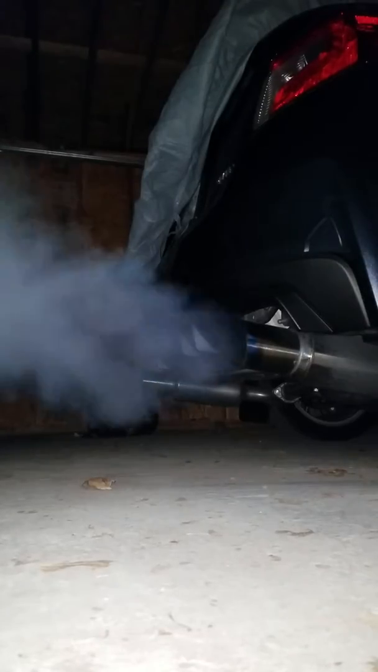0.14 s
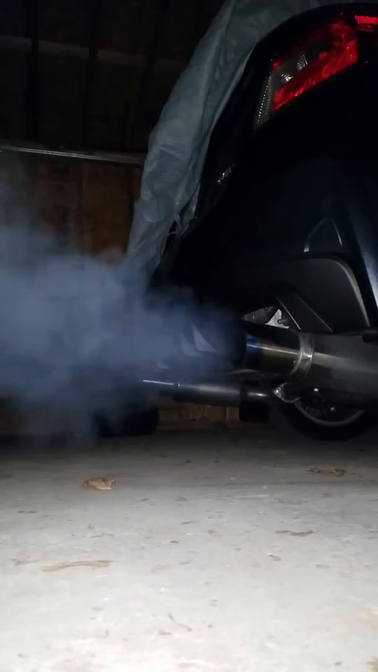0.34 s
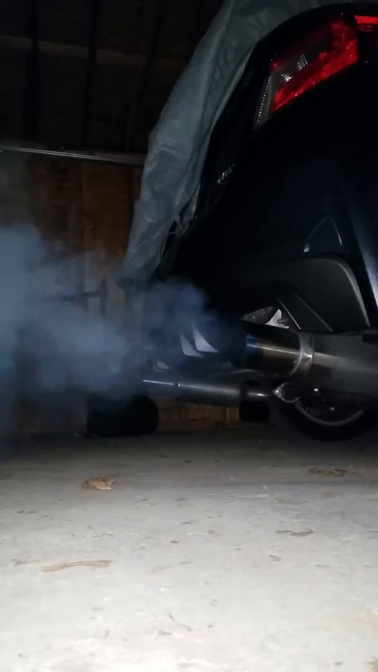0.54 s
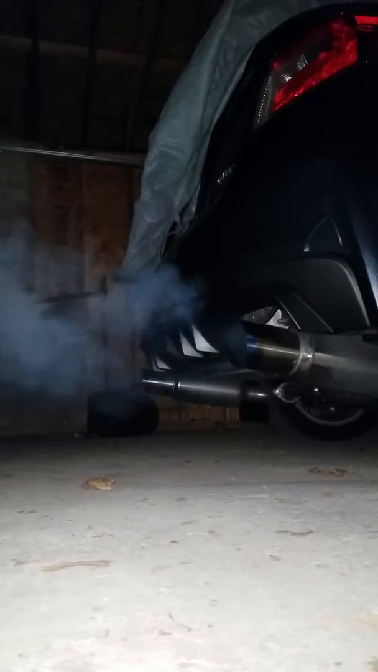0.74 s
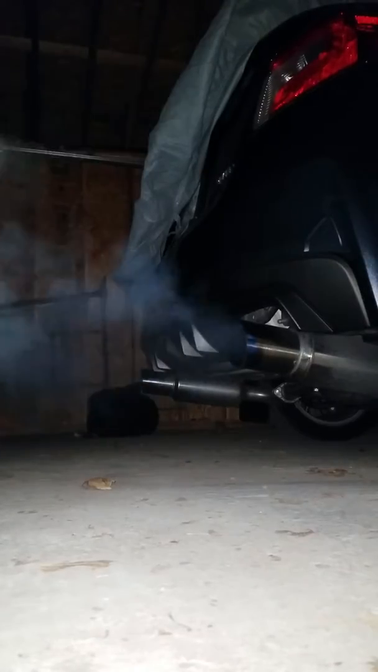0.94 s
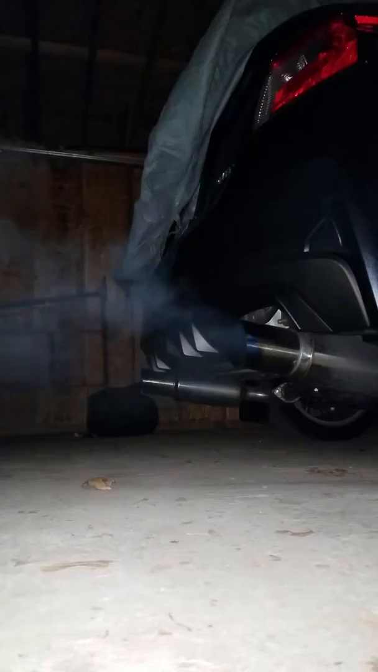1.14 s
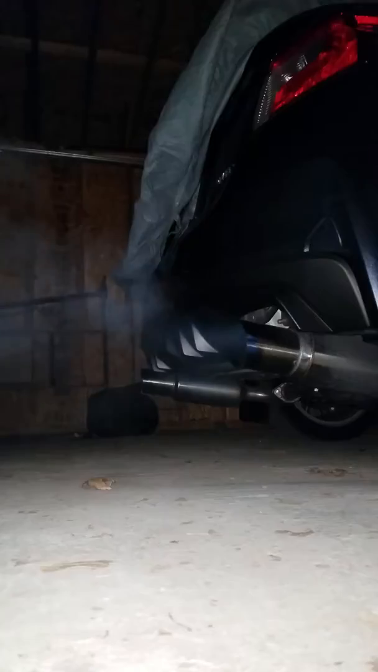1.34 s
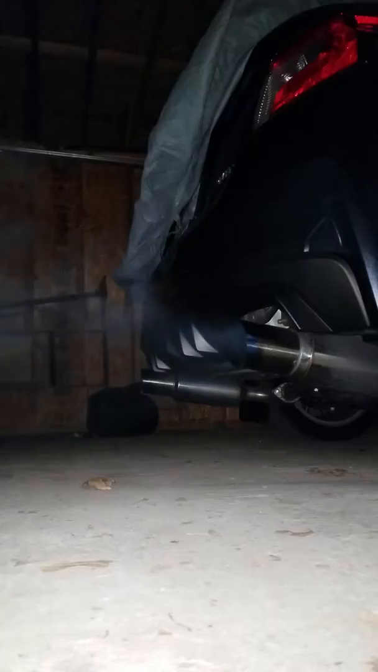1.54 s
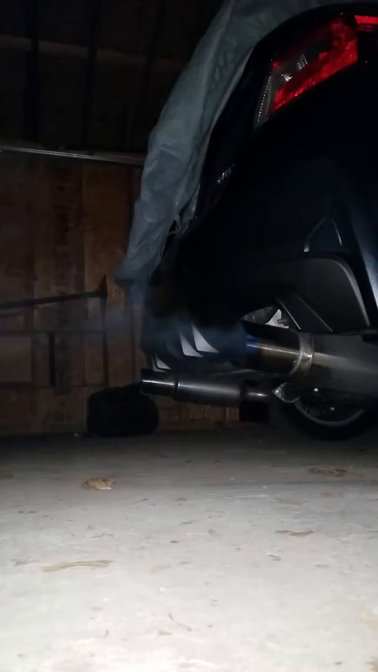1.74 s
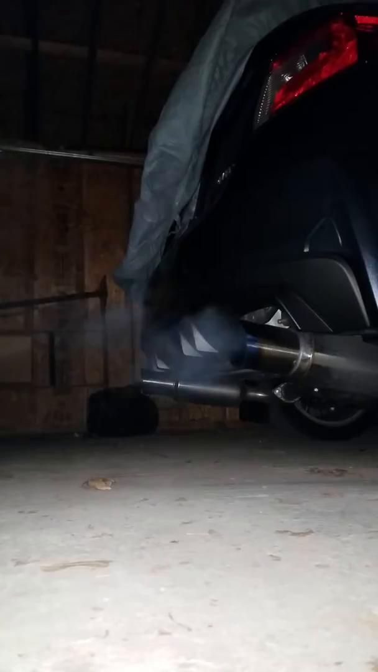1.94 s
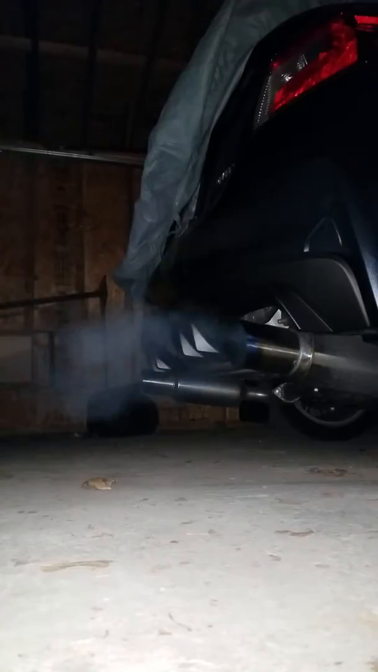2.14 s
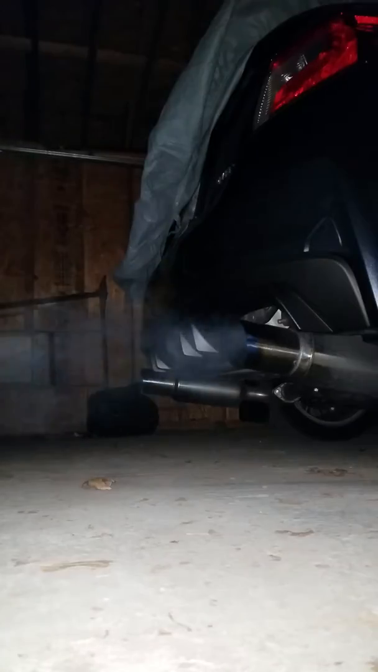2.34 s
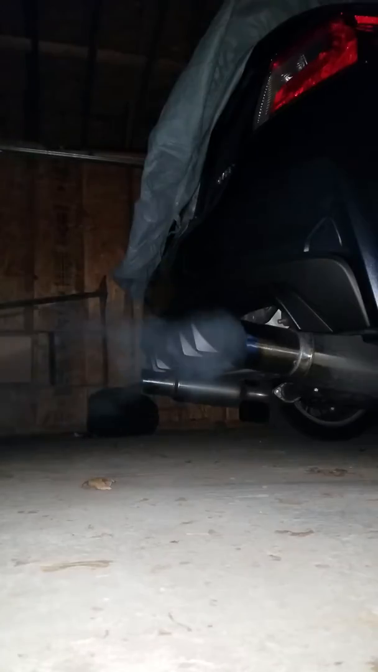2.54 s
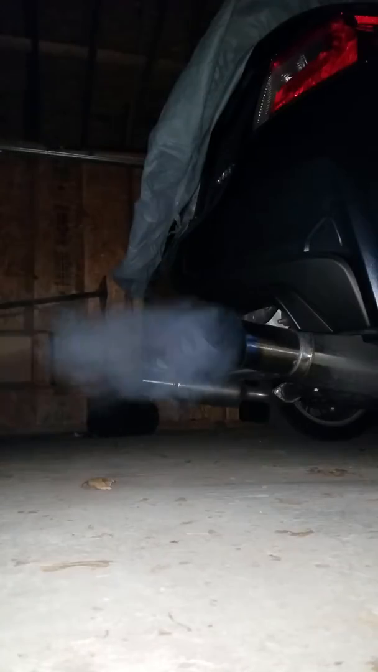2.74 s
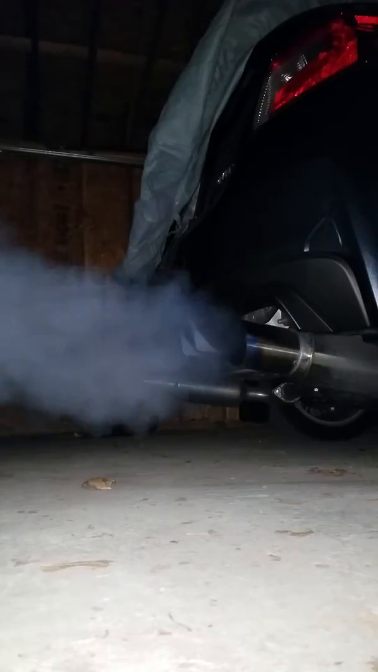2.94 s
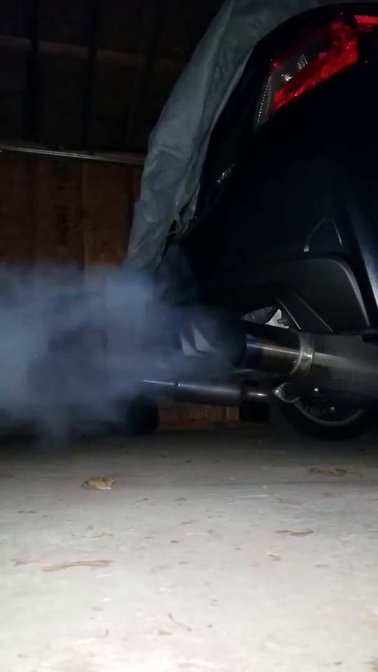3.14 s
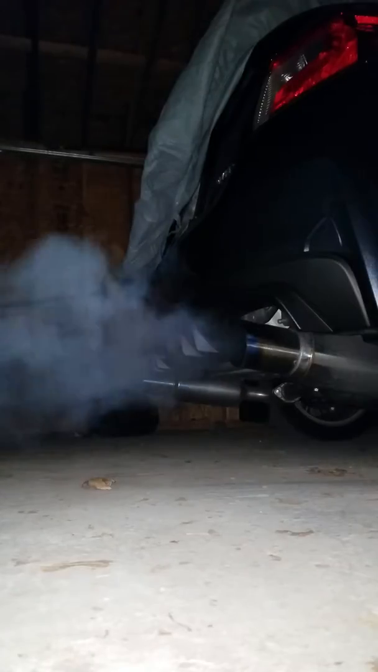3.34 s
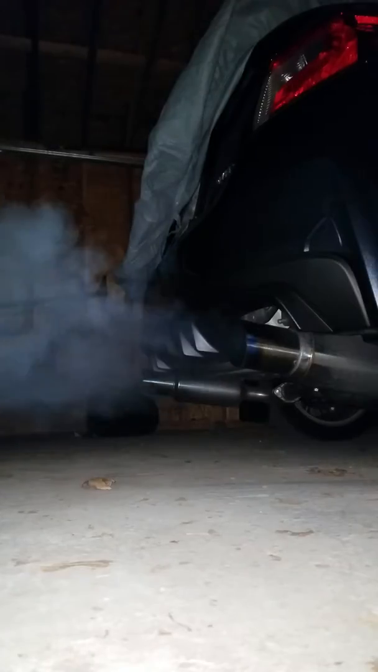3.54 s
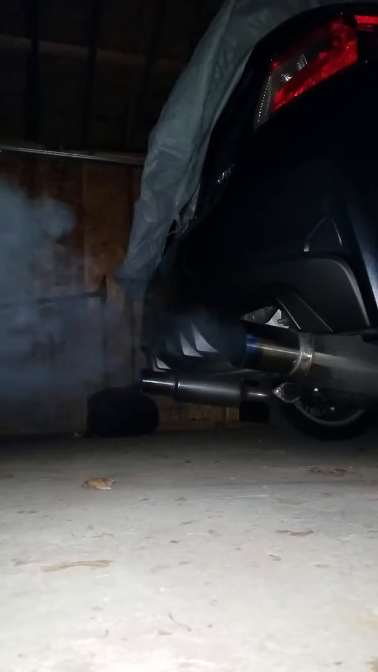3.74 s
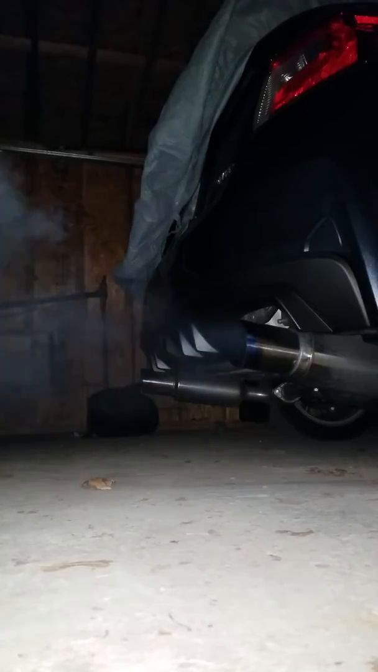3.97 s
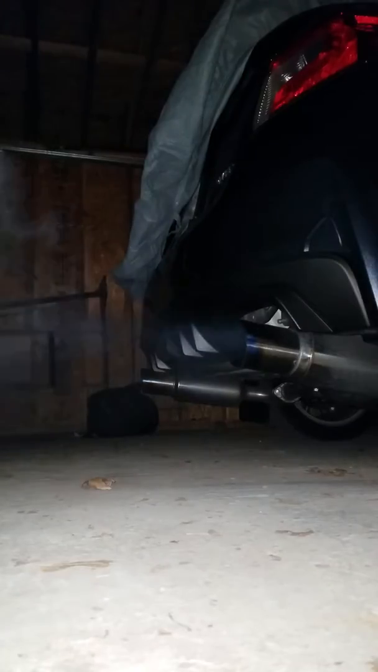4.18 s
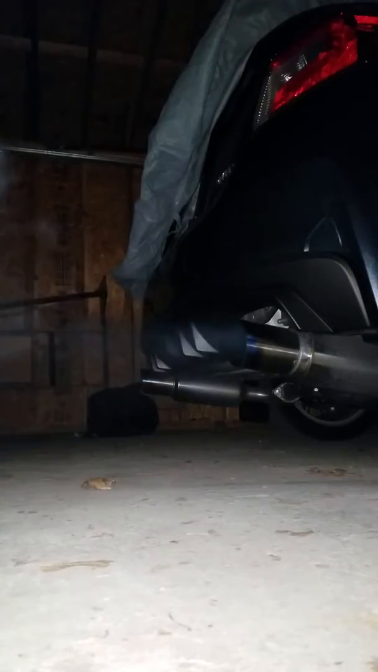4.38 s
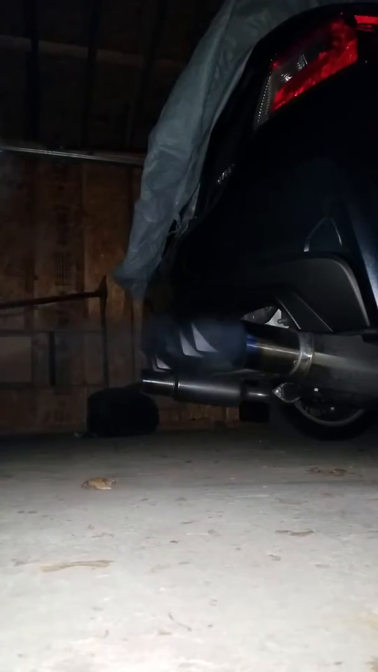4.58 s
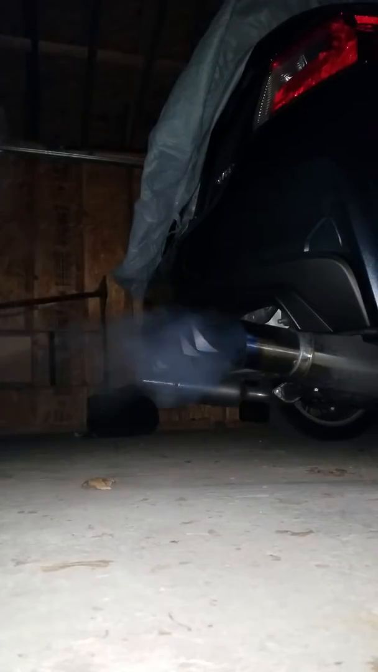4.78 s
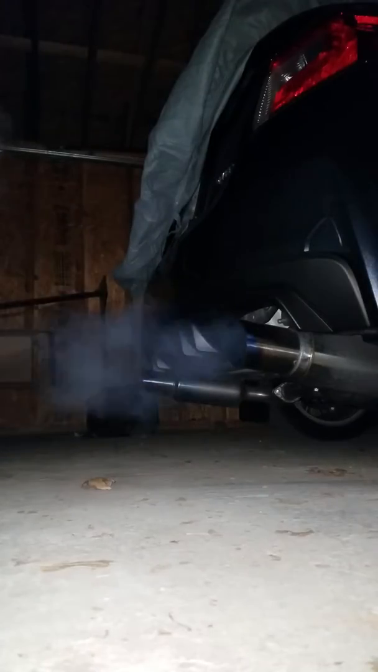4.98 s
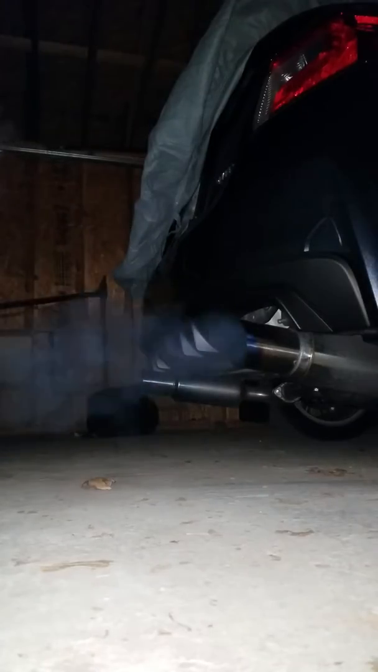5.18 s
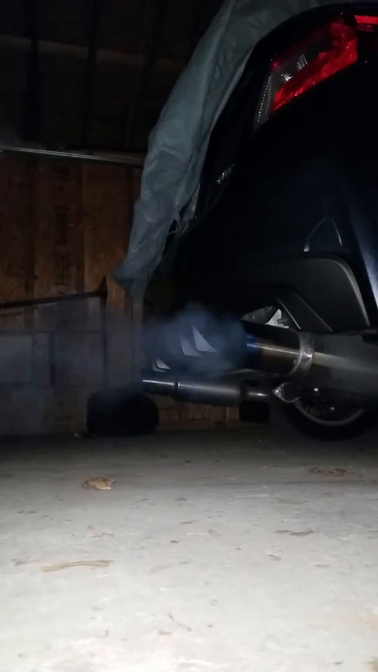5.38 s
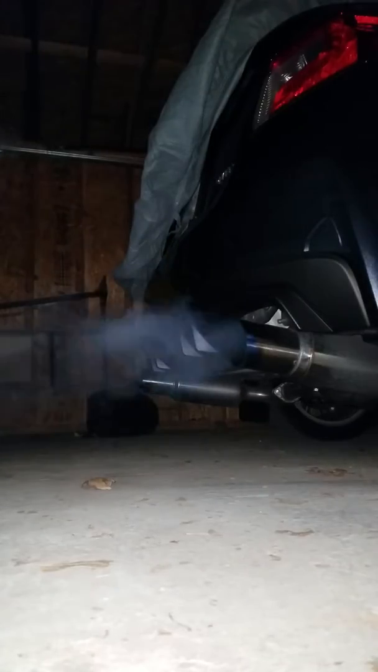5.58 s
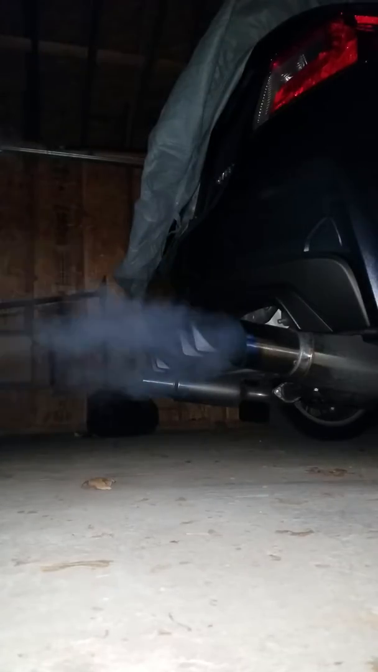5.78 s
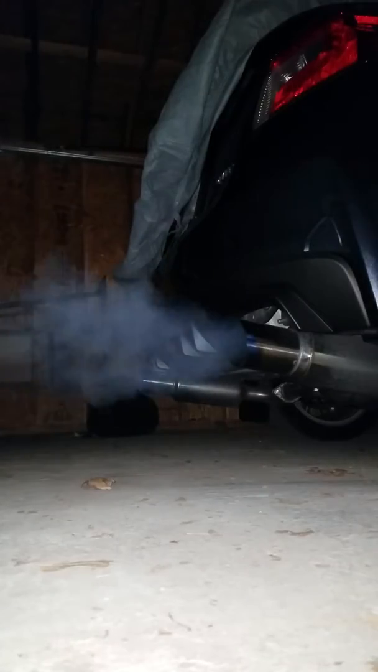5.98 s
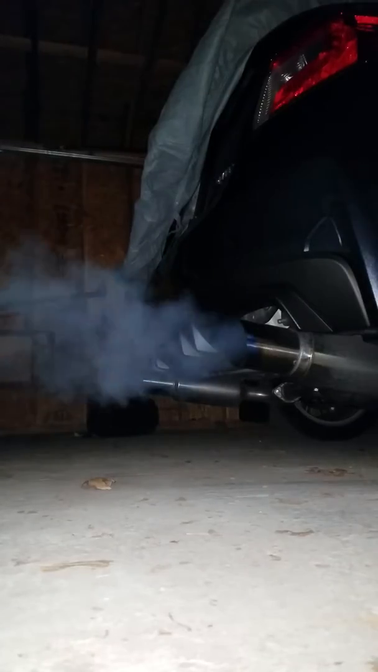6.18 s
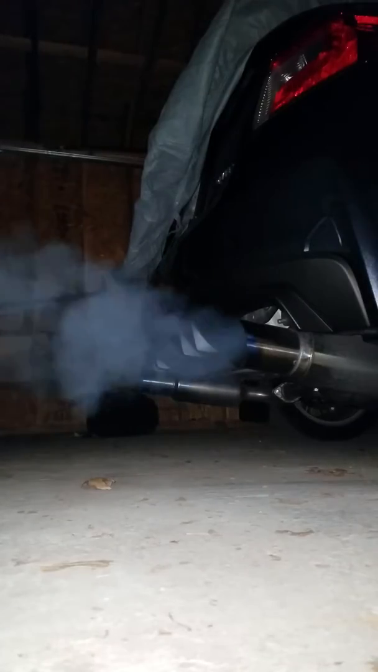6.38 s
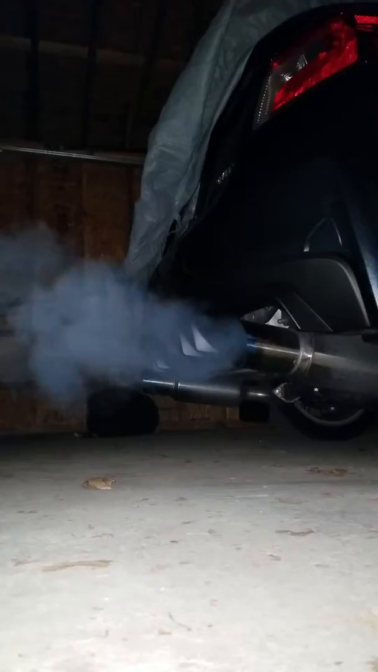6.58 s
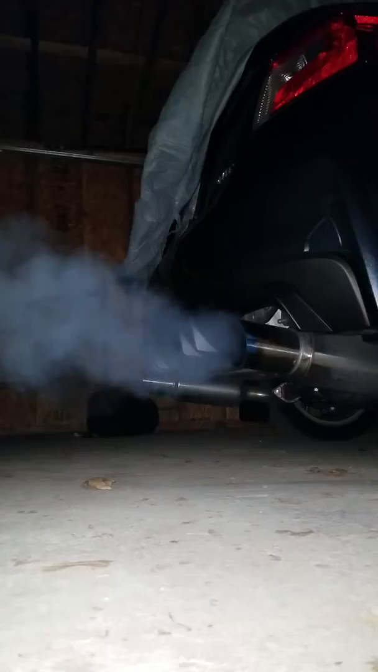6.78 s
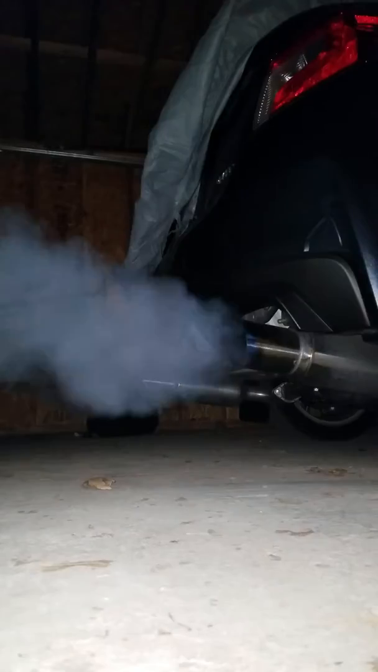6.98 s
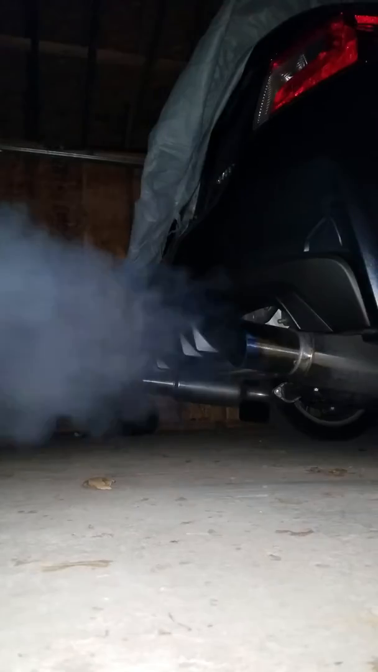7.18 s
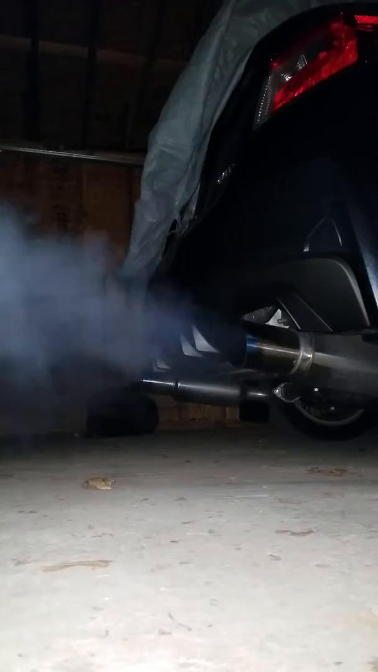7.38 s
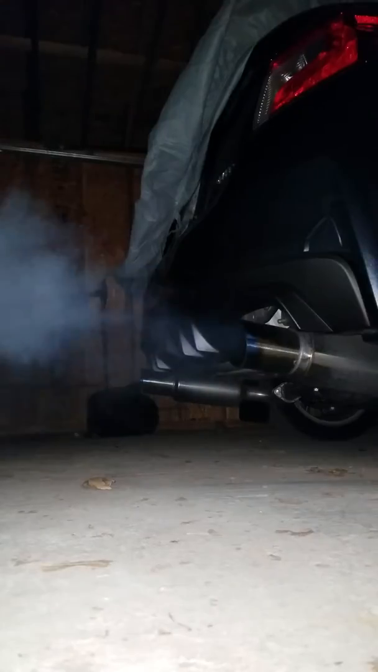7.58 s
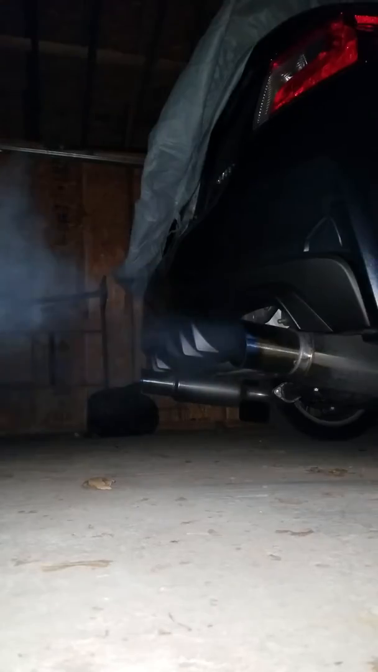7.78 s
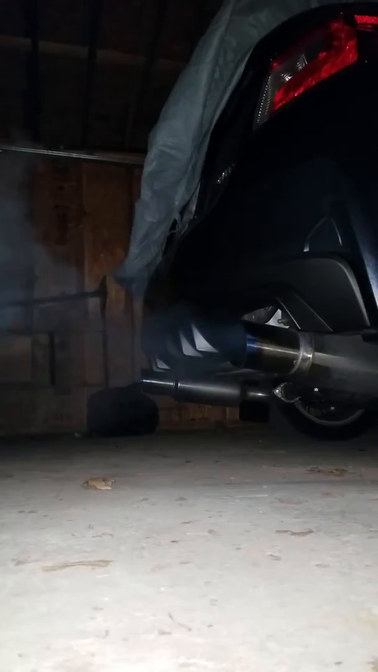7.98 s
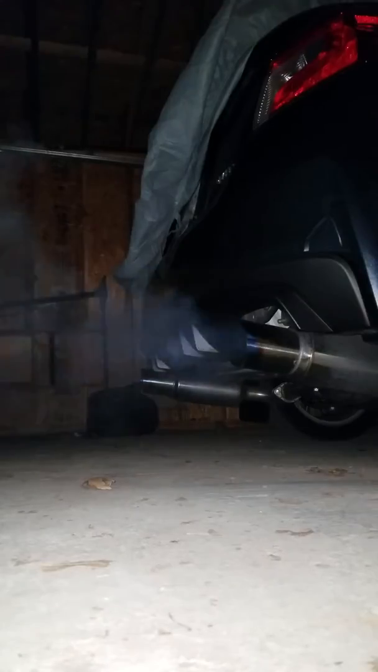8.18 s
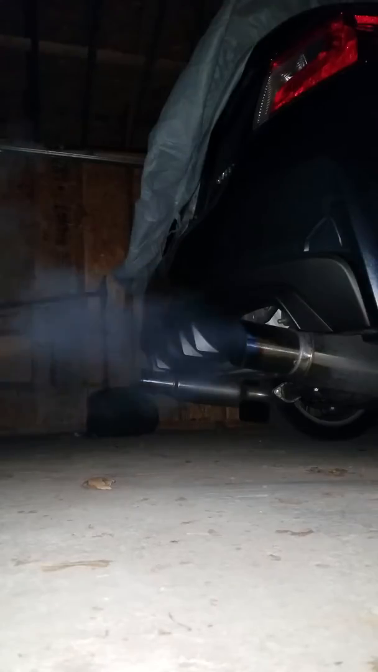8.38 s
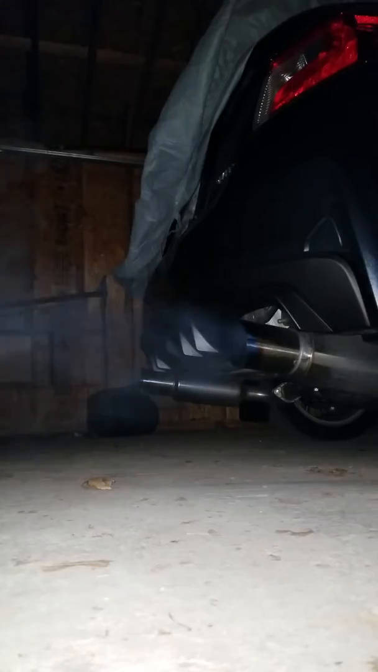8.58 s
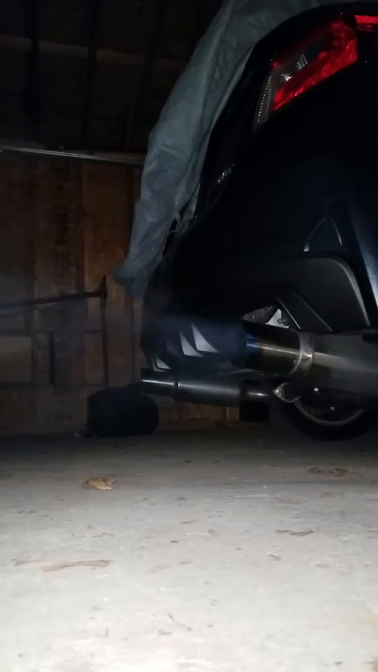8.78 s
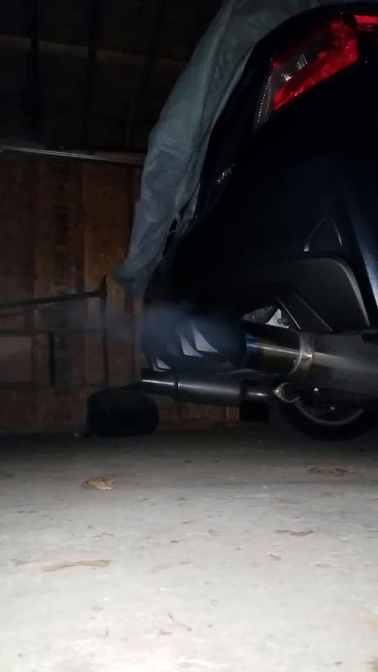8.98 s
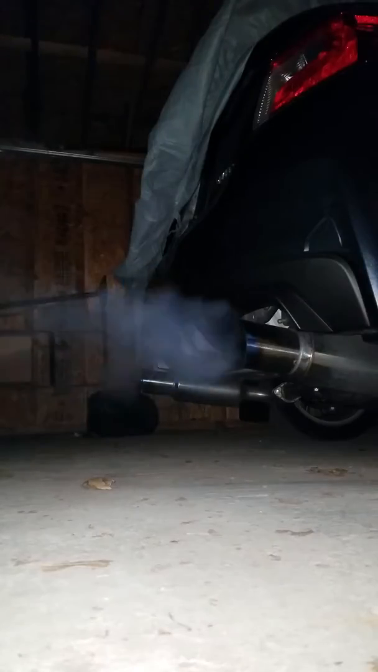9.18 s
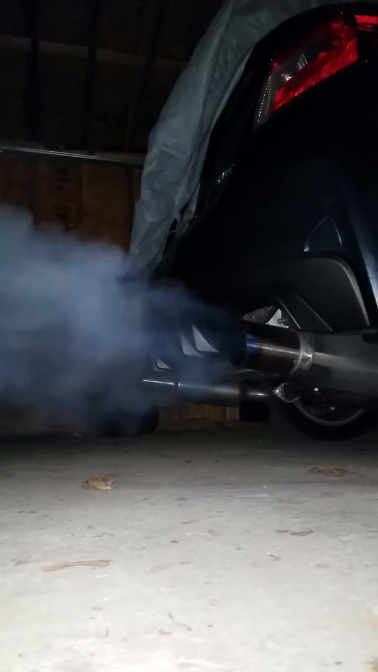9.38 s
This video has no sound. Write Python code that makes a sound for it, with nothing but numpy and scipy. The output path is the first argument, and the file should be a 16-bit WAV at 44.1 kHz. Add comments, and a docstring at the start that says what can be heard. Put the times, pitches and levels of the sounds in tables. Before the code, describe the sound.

A turbocharged flat-four heard very close to its large tailpipe in a closed wooden garage. A rev flares and sinks smoothly into a stumbling idle with dull pops; a second blip does the same, then a longer lumpy idle. A harder blip cracks and bangs, falls with a breathy turbo whistle, and another rev rises at the end.

```python
"""A turbocharged flat-four idles and is blipped in a closed garage, heard close to its big tailpipe.
Each firing sends a pulse and a puff of gas down the exhaust: lumpy under fuel, smooth as the revs fall.
Clean engine orders sing in silencer and pipes; leftover fuel pops, and full load brings cracks and bangs.
The turbo coasts down with a breathy whistle, over the hiss of gas and faint whines of the engine bay."""
import sys
import numpy as np
from scipy import signal
from scipy.fft import rfft, irfft
from scipy.io import wavfile
from scipy.ndimage import uniform_filter1d, minimum_filter1d

SR = 44100
rng = np.random.default_rng(int(sys.argv[2]) if len(sys.argv) > 2 else 0)


def persist_wave(psi):
    """Save psi, clipped to +-1, as 16-bit WAV."""
    counts = np.round(np.clip(psi, -1, 1) * 32767).astype(np.int16)
    wavfile.write(sys.argv[1], SR, np.atleast_2d(counts).T)


N = 415404
TIME = np.arange(N) / SR
REFERENCE_RATE = 60  # firings per s at which the layer levels hold

# The throttle is blipped. Each row: opens in s, fully open in s, shuts in s, strength in dB.
BLIPS = [(-.25,-.08,0.018,-1.5),(2.523,2.79,2.76,-0.5),(6.592,7.13,7.05,0.5),(9.022,9.28,9.62,1)]
# The fuel comes back and the engine stumbles. Each row: start in s, full in s, end in s, strength in dB.
STUMBLES = [(1.739,1.78,2.2,-2),(4.47,4.515,4.6,-1),(4.799,4.862,5.1,-5)]
# It settles to idle. Each row: start in s, full in s, end in s, strength in dB.
IDLES = [(1.755,2.3,2.72,-3),(4.5,5.497,6.85,-0.5)]
# Resonances of main pipe and tailpipe. Each row: pitch in Hz, width in Hz, strength in dB.
PIPE = [(206.8,25,1.8),(241.4,19.2,1.5),(282.3,8.8,-0.5),(344,49,-1.5),(402,38.6,1.2)]
TAILPIPE = [(450,40,2.5),(611.2,36,1),(682,38,-3.5),(770,59,-11)]
# Colour of the rasping gas. Each row: frequency in Hz, relative density in dB per Hz.
RASP = [(500,-6),(800,2.5),(980,7),(1120,0),(1270,6.5),(1420,-24.5),(1800,-30),(2600,-7),(4000,-44.5),(8000,-65.5)]


def from_db(db):
    """Decibels to gain."""
    return 10 ** (np.asarray(db) / 20)


def in_time(rows):
    """The columns of a curve at every sample."""
    s, *columns = np.transpose(rows)
    return [np.interp(TIME, s, c) for c in columns]


def at_hz(points, hz):
    """Read a spectrum on a logarithmic frequency axis."""
    known_hz, db = np.transpose(points)
    return np.interp(np.log(hz), np.log(known_hz), db)


def rms_one(x):
    """Scale to rms 1."""
    return x / np.sqrt(np.mean(x ** 2) + 1e-20)


def evened(x):
    """Hold the slow level at rms 1, keeping the single beats."""
    size = SR // 12
    power = uniform_filter1d(uniform_filter1d(x ** 2, size), size)
    return x / np.sqrt(power + 1e-14)


def cut(x, hz, kind, order=2):
    """Butterworth filter."""
    return signal.sosfilt(signal.butter(order, hz, kind, fs=SR, output="sos"), x)


def panned(x, left_db):
    """Place a sound by its left minus right level."""
    return x * from_db([[left_db / 2], [-left_db / 2]])


def noise(spectrum, alike):
    """Coloured stereo noise of rms 1, partly shared by both sides."""
    hz, _ = np.transpose(spectrum)
    freqs = np.maximum(np.arange(N // 2 + 1) * SR / N, 1)
    white = rng.standard_normal((3, N))
    alike = np.clip(alike, 0, 1)
    pair = np.sqrt(alike) * white[2] + np.sqrt(1 - alike) * white[:2]
    gain = from_db(at_hz(spectrum, freqs)) * np.minimum(freqs / hz[0], 1) ** 2
    return rms_one(irfft(rfft(pair) * gain, N))


def noise_band(hz, order=2):
    """A mono band of noise of rms 1."""
    return rms_one(cut(rng.standard_normal(N), hz, "band", order))


def breathy_tone(hz, width_hz):
    """A narrow stereo band of noise around a pitch that may move."""
    a, b = cut(rng.standard_normal((2, 2, N)), width_hz / 2, "low")
    phase = 2 * np.pi * np.cumsum(hz * np.ones(N)) / SR
    return rms_one(a * np.cos(phase) + b * np.sin(phase))


def waver(hz):
    """Slow chance of spread 1, drawn at 200 steps per second."""
    steps = rng.standard_normal(int(TIME[-1] * 200) + 200)
    low_pass = signal.butter(2, min(hz, 90), fs=200, output="sos")
    slow = signal.sosfilt(low_pass, steps)[199:]
    return np.interp(TIME * 200, np.arange(len(slow)), rms_one(slow))


def resonate(x, modes):
    """Parallel resonances of alternating sign."""
    out = 0
    for k, (hz, width, db) in enumerate(modes):
        r = np.exp(-np.pi * width / SR)
        poles = [1, -2 * r * np.cos(2 * np.pi * hz / SR), r * r]
        ring = (1 - r * r) / 2 * signal.lfilter([1, 0, -1], poles, x + 1e-18)
        out = out + (-1) ** k * from_db(db) * ring
    return out


def strikes(rows):
    """One click for each event."""
    clicks = np.zeros(N)
    for s, db in rows:
        clicks[round(s * SR)] = from_db(db)
    return clicks


def puffs(clicks, decay_s):
    """The gas flow after each click dies away quickly."""
    return signal.lfilter([1], [1, -np.exp(-1 / (decay_s * SR))], clicks + 1e-18)


def gesture(rows, release_s):
    """Each event swells smoothly, holds and rolls off; the strongest one counts."""
    t = TIME[::64]
    each = []
    for start, full, end, db in rows:
        swell = np.sin(np.pi / 2 * np.clip((t - start) / max(full - start, .01), 0, 1)) ** 2
        release = np.exp(-(np.maximum(t - end, 0) / release_s) ** 2)
        each.append(from_db(db) * swell * release)
    return np.interp(TIME, t, np.max(each, axis=0) + 1e-9)


def states(release_s):
    """How far the engine is coasting, blipped, burbling, stumbling and idling."""
    # Leftover fuel burbles as the revs fall. Each row: start in s, full in s, end in s, strength in dB.
    burbles = [(.52,0.6,0.71,1),(3.34,3.48,3.59,0),(7.15,7.3,7.88,1),(7.9,8.0,8.2,-2.5),(8.2,8.35,8.55,-8)]
    # burbles and stumbles let go sooner than a blip
    return [1, gesture(BLIPS, release_s), gesture(burbles, 0.21 * release_s),
            gesture(STUMBLES, 0.27 * release_s), gesture(IDLES, release_s)]


def loudness(layer, octaves):
    """A layer's gain: the states add in power, and speed tilts the sum."""
    *state_db, db_per_octave, release_s = layer
    power = sum((from_db(db) * state) ** 2 for db, state in zip(state_db, states(release_s)))
    return np.sqrt(power) * from_db(db_per_octave * octaves)


def roughness(octaves):
    """Combustion is uneven under fuel and smooths out with speed."""
    # One row: unevenness (0-1) added by coasting, blip, burble, stumble and idle,
    # share lost per octave of speed, release in s.
    unevenness = (0.27, 0.3, 0.14, 0.5, 0.017, 0.85, 0.2)
    *shares, smoothing, release_s = unevenness
    rough = sum(share * state for share, state in zip(shares, states(release_s)))
    return np.clip(rough * (1 - smoothing * octaves), .05, 1.1)


def lulled():
    """The fuel is cut and the pipe falls quiet: what is left of its sound, 0-1."""
    # Each row: start in s, deepest in s, end in s, depth in dB relative to a full lull.
    lulls = [(.26,.45,0.51,-1.5),(3.1,3.28,3.35,-1.5),(8.35,8.74,8.76,-3),(8.7,8.85,9.05,-8)]
    full_lull_share = 0.48  # of the pipe's gain that a full lull takes away
    return 1 - np.clip(full_lull_share * gesture(lulls, release_s=0.061), 0, 1)


def tip_in():
    """The bass heaves with the first full charges after each opening of the throttle."""
    delay_s, width_s = 0.15, 0.1
    return sum(np.exp(-((TIME - start - delay_s) / width_s) ** 2) for start, *_ in BLIPS)


def firings(turns, rough, scatter_db, jitter):
    """One click per firing; rough running makes them uneven in strength and timing."""
    # Unequal headers: one strength in dB for each cylinder, at full roughness.
    cylinder_db = [-1.5, 1, -8.5, -0.5]
    # Lateness of each cylinder in firing intervals, at full roughness.
    cylinder_lag = [-0.0074, 0.059, -0.015, 0.051]
    number = np.arange(int(turns[-1]) + 1)
    chance = rng.standard_normal((len(number), 2))
    uneven = np.interp(number, turns, rough)
    cylinder = number % len(cylinder_db)
    late = uneven * (np.array(cylinder_lag)[cylinder] + jitter * chance[:, 0])
    at = np.minimum(np.searchsorted(turns, number + late), N - 1)
    clicks = np.zeros(N)
    clicks[at] = from_db(uneven * (np.array(cylinder_db)[cylinder] + scatter_db * chance[:, 1]))
    return clicks


def boom(turns, rate, rough):
    """The two lowest orders sweep the garage's standing waves; fuel lifts the second, roughness shakes both."""
    # Standing waves as the orders meet them. Each row: frequency in Hz, level in dB.
    standing_waves = [(29,-42),(37,-29.5),(42,-15),(47,-21),(50,-13),(54,-15.5),(58,-10.5),(62,-11.5),(69,-16.5),(76,-13.5),(85,-28),(95,-17),(110,-10.5),(190,-36)]
    blip_db, coast_db, fuel_db, heave_db = -2.0, -10.5, -4.0, 7.0
    top_hz = 133  # the second order falls away steeply above this
    throttle = gesture(BLIPS, release_s=0.32)
    fuel = throttle + gesture(IDLES, release_s=.1) + 0.57 * gesture(STUMBLES, release_s=0.23)
    fuel = np.minimum(fuel, 1)
    first = from_db(at_hz(standing_waves, rate) + blip_db * throttle)
    second_db = at_hz(standing_waves, 2 * rate) + coast_db * (1 - fuel) + fuel_db * fuel
    second = from_db(second_db + heave_db * tip_in())
    second = second / np.sqrt(1 + (rate * 2 / top_hz) ** 12)
    shake = 1 + 0.58 * rough ** 2 * rms_one(cut(rng.standard_normal(N), 12, "low"))
    waves = first * np.sin(2 * np.pi * turns) + second * np.sin(4 * np.pi * turns)
    return np.sqrt(2) * shake * waves


def engine_order(turns, order):
    """A clean tone at a multiple of the firing rate; rms 1."""
    return np.sqrt(2) * np.cos(2 * np.pi * order * turns)


def song(turns, rate, spectrum, orders, flutter_db):
    """Clean orders swell as they glide through a section's resonances, each fluttering by flutter_db."""
    total = 0
    for k, db in orders:
        level_db = db + at_hz(spectrum, k * rate) + flutter_db * waver(hz=12.0)
        total = total + from_db(level_db) * engine_order(turns, order=k)
    return total


def singing_orders(turns, rate, octaves, rough, firing):
    """Silencer, main pipe and tailpipe each favour some orders; rough running breaks them up."""
    # Where the orders sing out. Each row: frequency in Hz, level in dB.
    silencer_song = [(85,-48),(120,-29),(145,-12),(162,-29),(185,-38.5),(208,-21),(220,-23.5),(233,-16.5),(255,-32),(285,-24.5),(320,-45.5)]
    pipe_song = [(250,-44.5),(275,-33.5),(292,-24),(310,-28),(335,-11),(360,-16),(388,-13),(402,-16),(417,-29),(440,-21.5),(465,-33.5),(490,-25.5),(520,-54.5)]
    tailpipe_song = [(395,-38.5),(425,-20.5),(470,-25),(500,-33.5),(540,-19.5),(565,-23),(595,-14),(620,-32),(655,-23.5),(690,-40),(780,-29),(900,-49)]
    # The orders each favours. Each row: multiple of the firing rate, level in dB.
    silencer_orders = [(3,-7),(4,0),(5,0)]
    pipe_orders = [(4,0),(5,0),(6,-3),(7,-9)]
    tailpipe_orders = [(6,-2),(7,0),(8,-1),(9,-2),(10,-3),(11,-4)]
    # How loud each sings. One row: coasting, blip, burble, stumble and idle in dB,
    # tilt in dB per octave of speed, release in s.
    silencer_singing = (-9, 5.5, -8, -16, 3, 0.5, 0.64)
    pipe_singing = (-31.5, 1, -2.5, -16, -34, -2.5, 0.32)
    tailpipe_singing = (-19.5, 1.5, -16.5, -23, -26, -6, 0.49)
    silencer = song(turns, rate, silencer_song, silencer_orders, flutter_db=0.0)
    pipe = song(turns, rate, pipe_song, pipe_orders, flutter_db=1.5)
    tailpipe = song(turns, rate, tailpipe_song, tailpipe_orders, flutter_db=1.95)
    tones = loudness(silencer_singing, octaves) * silencer
    tones = tones + firing * loudness(pipe_singing, octaves) * pipe
    tones = tones + firing ** 1.46 * loudness(tailpipe_singing, octaves) * tailpipe
    return np.clip(1.5 - 1.7 * rough, .15, 1) * tones


def walls(x):
    """The first echoes fill the gaps between firings."""
    # Nearest surfaces of the garage. Each row: delay in ms, level in dB.
    surfaces = [(5.5,-16),(11.2,-19),(17.1,-13.5),(24.3,-12.5)]
    echoes = sum(from_db(db) * np.interp(TIME - ms / 1000, TIME, x, left=0) for ms, db in surfaces)
    return x + echoes


def pipe_note(clicks, rough, modes, low_hz, high_hz, turbulence, steady_swirl):
    """Pulses and the turbulent gas behind them ring one section of the exhaust; rms 1."""
    swirl = evened(puffs(clicks, decay_s=0.049) * rng.standard_normal(N))
    # with the throttle shut the swirl dies down and the orders sing clean
    burning = np.clip(rough / .3, .3, 1)
    swirl_gain = burning * (steady_swirl + turbulence * rough)
    ringing = resonate(evened(clicks) + swirl_gain * swirl, modes)
    band = cut(cut(ringing, low_hz, "high", order=4), high_hz, "low", order=4)
    return evened(walls(band))


def silencer_drone(pulses, rough, octaves, firing):
    """The pressure pulses ring the silencer, with a heave as the throttle opens."""
    # Resonances of the silencer. Each row: pitch in Hz, width in Hz, strength in dB.
    silencer = [(116.3,23,-8.5),(145.07,3.65,4),(172.7,15,-9)]
    # One row: coasting, blip, burble, stumble and idle in dB, tilt in dB per octave of speed, release in s.
    drone = (-34.5, -19, -48.5, -29, -27, -5, 0.84)
    gain = firing * loudness(drone, octaves) + from_db(-23.0) * tip_in()
    return gain * pipe_note(pulses, rough, silencer, low_hz=95.6, high_hz=198.0,
                            turbulence=0.89, steady_swirl=.02)


def pipe_voices(fronts, rate, rough, octaves, firing):
    """Sharp fronts ring the main pipe, low as growl and high as bark, and blare in the tailpipe."""
    # One row per layer: coasting, blip, burble, stumble and idle in dB,
    # tilt in dB per octave of speed, release in s.
    growl_levels = (-31, -20, -30, -26.5, -36, -1, 1)
    bark_levels = (-31.5, -14, -17.5, -18, -27.5, 0.5, 0.99)
    blare_levels = (-34, -18.5, -26, -27, -30, 3.5, 0.54)
    # from 56 to 72 firings per s the separate barks merge into the clean orders
    separate = 1 - .78 * np.clip((rate - 56) / (72 - 56), 0, 1)
    growl = pipe_note(fronts, rough, PIPE[:2], low_hz=151.5, high_hz=269,
                      turbulence=0.98, steady_swirl=0.39)
    bark = pipe_note(fronts, rough, PIPE[2:], low_hz=232, high_hz=452,
                     turbulence=0.92, steady_swirl=0.67)
    blare = pipe_note(fronts, rough, TAILPIPE, low_hz=407, high_hz=920,
                      turbulence=4.4, steady_swirl=0.39)
    growl = firing * loudness(growl_levels, octaves) * growl
    bark = separate * firing * loudness(bark_levels, octaves) * bark
    blare = np.sqrt(separate * firing) * loudness(blare_levels, octaves) * blare
    return growl + bark + blare


def gas_noises(flow, octaves, firing, spray_db):
    """Firings chop the escaping gas into rasp and hiss, more sharply the louder the rasp."""
    # One row per layer: coasting, blip, burble, stumble and idle in dB,
    # tilt in dB per octave of speed, release in s.
    rasp_levels = (-38.5, -28, -34.5, -34.5, -49, -0.5, 0.26)
    hiss_levels = (-38.5, -34.5, -45.5, -36.5, -64, 0.5, 0.4)
    # Colour of the hiss. Each row: frequency in Hz, relative density in dB per Hz.
    hiss_colour = [(700,3),(1500,2),(2000,1),(2500,3.5),(2800,-1.5),(3100,-5.5),(4200,-24),(6000,-35.5),(9000,-29.5)]
    rasp_gain = loudness(rasp_levels, octaves)
    blast = np.clip((20 * np.log10(rasp_gain) + 32.2) / 7, 0, 1.5)
    rasp = evened((0.085 + blast) * flow + 0.58) * noise(RASP, alike=0.66)
    rasp = np.sqrt(firing) * rasp_gain * rasp
    # the hiss partly follows the spray's level
    hiss_gain = loudness(hiss_levels, octaves) * from_db(0.65 * (spray_db - spray_db.mean()))
    hiss = hiss_gain * evened((.15 + blast) * flow + 0.9) * noise(hiss_colour, alike=0.043)
    return cut(rasp, 5000, "low", order=4), hiss


def fine_spray(flow, spray_db):
    """A fine treble spray of gas, with short spits as the throttle opens."""
    # Colour of the spray. Each row: frequency in Hz, relative density in dB per Hz.
    spray_colour = [(2000,-4),(3600,2.5),(5000,-1),(5900,-7.5),(7000,-10),(8600,-20),(9600,-21.5),(11000,-13.5),(15500,-12)]
    # Gas spits out. Each row: peak time in s, level in dB.
    spit_times = [(0,-58),(2.73,-44),(6.9,-40),(9.14,-36.5)]
    spits = sum(from_db(db) * np.exp(-np.abs(TIME - s) / 0.019) for s, db in spit_times)
    spray = (from_db(spray_db + 3.5) + spits) * evened(flow + 7) * noise(spray_colour, alike=0.02)
    # the top octave leans the other way
    lower = panned(cut(spray, 9500, "low", order=4), -1.8)
    return lower + panned(cut(spray, 9800, "high", order=4), 3.0)


def turbo(flow):
    """The coasting turbine sinks from an airy hiss to a whistle, and wakes the bore's resonance in passing."""
    # Each blip spins it up, then it coasts down. Each row: time in s, whistle in Hz, relative level in dB.
    spin = [(0,2600,-14),(.35,2850,-5),(.8,2300,-4),(1.5,1650,-2),(2.07,1285,2),(2.35,1195,1),(2.63,1055,-2),(2.71,1270,2),(2.77,1330,1),(2.87,1600,-12),(3.2,2850,-9),(3.5,2500,-3),(4.2,1750,-2),(4.93,1310,-2),(5.06,1245,1),(5.36,1005,0),(5.62,955,0),(5.9,885,0),(6.8,860,-3),(6.95,1400,-14),(7.25,4100,-3),(8,2850,0),(8.8,1970,-0.5),(9.15,1780,0),(9.42,2800,-4)]
    # Loudness of the whistle by its pitch. Each row: pitch in Hz, level in dB.
    whistle_levels = [(850,-40),(980,-35),(1090,-36.5),(1150,-39.5),(1210,-32.5),(1270,-30.5),(1400,-46),(1600,-47),(1850,-41.5),(2200,-42),(2800,-42),(3300,-49),(4200,-55)]
    cross_mode_hz = 1275  # resonance across the bore of the tailpipe
    hz, db = in_time(spin)
    fast = np.clip((hz - 1300) / 400, 0, 1)
    core = engine_order(np.cumsum(hz + 28 * waver(hz=60)) / SR, order=1)
    narrow = .55 * core + .65 * breathy_tone(hz, width_hz=95)
    whistle = np.sqrt(1 - fast) * narrow + np.sqrt(fast) * breathy_tone(hz, width_hz=560)
    nearness = 1 / np.hypot(1, (hz - cross_mode_hz) / 130)
    howl = 0.6 * nearness * breathy_tone(cross_mode_hz, width_hz=18)
    return from_db(db + at_hz(whistle_levels, hz)) * (whistle + howl) * evened(flow + 0.8)


def engine_bay():
    """Faint steady whines of the engine bay, each a narrow band of noise."""
    # Each row: pitch in Hz, width in Hz, level in dB.
    whines = [(3450,62,-61.5),(5810,270,-60.5)]
    return sum(from_db(db) * breathy_tone(hz, width) for hz, width, db in whines)


def crackle(fronts):
    """Under full load the fronts steepen into cracks, and a few go off as bangs that ring the tailpipe."""
    # Sharp bangs. Each row: time in s, relative strength in dB.
    bang_times = [(2.72,-7),(2.741,-4),(2.762,-4),(2.837,-6),(6.879,-5),(6.942,-9),(7.0,-1),(7.037,0),(7.064,-1),(7.144,-1),(7.155,3),(9.17,-6),(9.227,-3),(9.261,-2),(9.354,-7)]
    # Colour of their crack. Each row: frequency in Hz, relative density in dB per Hz.
    crack_colour = [(450,5),(700,7),(1000,5),(1350,-1.5),(1700,-13.5),(2600,-8),(3500,-20),(5000,-38.5)]
    bangs = strikes(bang_times)
    load = np.minimum(gesture(BLIPS, release_s=0.17), 1) ** 3
    shocks = from_db(-11.5) * bangs + from_db(-19) * load * np.minimum(fronts, 1.3)
    cracks = puffs(shocks, decay_s=0.0035) * noise(crack_colour, alike=0.84)
    thuds = from_db(32) * resonate(bangs, TAILPIPE)
    return cut(cracks + thuds, 3500, "low", order=4)


def pops():
    """Short bursts ring the pipe, each with a dull puff of gas: mostly unburnt fuel going off, while those at
    2.579 and 2.641 s are single strong firings."""
    # Dull pops. Each row: time in s, relative strength in dB.
    pop_times = [(.545,-15),(.949,-16),(1.032,-15),(1.753,-13),(1.808,-15),(1.851,-12),(2.075,-11),(2.44,-16),(2.579,-18),(2.641,-11),(3.772,-16),(4.505,-11),(4.758,-12),(4.848,-11),(4.885,-15),(5.045,-13),(5.109,-15),(6.425,-20),(6.7,-18),(6.833,-16),(7.902,-15),(8.212,-7),(8.266,-8),(8.348,-18),(9.103,-17)]
    clicks = strikes(pop_times)
    thud = cut(resonate(clicks, PIPE + TAILPIPE), 1600, "low")
    puff = cut(puffs(clicks, decay_s=0.005) * noise(RASP, alike=0.68), 1500, "low", order=4)
    return from_db(39.0) * walls(thud) + from_db(-9) * puff


def garage(x, t60, low_hz, top_hz, apart_hz):
    """Dense reflections off wooden walls; only the short waves differ between the sides."""
    t = TIME[:SR // 2]
    tail = rng.standard_normal((2, len(t))) * from_db(-60 * t / t60) * (t > .004)
    tail = tail / np.sqrt(np.sum(tail ** 2) / 2)
    mid, side = cut(cut(tail, low_hz, "high"), top_hz, "low")
    side = cut(side, apart_hz, "high")
    return signal.fftconvolve(x, np.array([mid + side, mid - side]), axes=-1)[:, :N]


def scene():
    """Firings drive the exhaust note and chop the escaping gas; the garage answers."""
    # Engine speed. Each row: time in s, firings per s.
    speed = [(0,58),(.1,68.6),(.2,75),(.3,78.2),(.42,78.6),(.6,72.6),(.85,64.3),(1.1,56),(1.5,48),(1.85,39),(2,31.6),(2.4,29.2),(2.55,28.9),(2.63,30.5),(2.72,39.6),(2.82,55),(2.92,68.4),(3.04,75.3),(3.14,77.4),(3.28,77.4),(3.52,67.6),(3.85,57),(4.4,45.3),(4.64,36),(4.85,34.8),(5.28,27.3),(5.6,29.9),(5.95,29.5),(6.58,28.7),(6.72,31.2),(6.8,36),(6.95,49.4),(7.1,73.9),(7.2,92.5),(7.28,97.4),(7.6,83.5),(8,65.4),(8.35,51),(8.6,47),(9.05,43.9),(9.19,49),(9.3,72),(9.42,91)]
    # Rise and fall of the fine spray. Each row: time in s, relative level in dB.
    spray_level = [(0.0, -53), (0.34, -51), (0.5, -47.5), (1.02, -52), (1.62, -46.5), (1.97, -44.5),
                   (2.68, -46.5), (2.86, -50), (3.15, -52.5), (3.36, -45.5), (3.62, -52), (4.46, -46),
                   (4.72, -45), (7.69, -48.5), (8.03, -52.5), (8.84, -54), (9.18, -41), (9.42, -59.5)]
    rate, = in_time(speed)
    spray_db, = in_time(spray_level)
    octaves = np.log2(rate / REFERENCE_RATE)
    rough = roughness(octaves)
    turns = np.cumsum(rate) / SR  # counted in firings
    firing = lulled()
    # the pressure pulses are steadier than their sharp fronts
    pulses = firings(turns, rough ** 2, scatter_db=8.0, jitter=0.04)
    fronts = firings(turns, rough, scatter_db=7.0, jitter=0.028)
    flow = evened(puffs(fronts, decay_s=0.02))
    # rough running also churns the gas between the orders
    churn = from_db(-21.5) * rough * noise_band([62, 120], order=3)
    rumble = from_db(-38.5) * noise_band([32, 90])
    bass = boom(turns, rate, rough) + churn + rumble + silencer_drone(pulses, rough, octaves, firing)
    tones = singing_orders(turns, rate, octaves, rough, firing)
    voices = pipe_voices(fronts, rate, rough, octaves, firing)
    rasp, hiss = gas_noises(flow, octaves, firing, spray_db)
    note = panned(bass + tones, -1.62) + panned(voices + pops(), -3.14)
    exhaust = note + panned(rasp + crackle(fronts), -0.97)
    room = from_db(-9.5) * garage(exhaust, t60=0.36, low_hz=405, top_hz=5000, apart_hz=550)
    air = panned(hiss + turbo(flow) + engine_bay(), -1.2)
    return exhaust + room + air + fine_spray(flow, spray_db)


def record(dry):
    """A fast limiter holds the highest peaks and the top is cut at 15.9 kHz."""
    size = SR // 200
    gain = np.minimum(1, .97 / (np.abs(dry).max(axis=0) + 1e-9))
    held = dry * uniform_filter1d(minimum_filter1d(gain, size), size)
    return signal.sosfilt(signal.ellip(10, .1, 90, 15900, fs=SR, output="sos"), held)


dry = scene()
out = record(dry)
persist_wave(out)
```